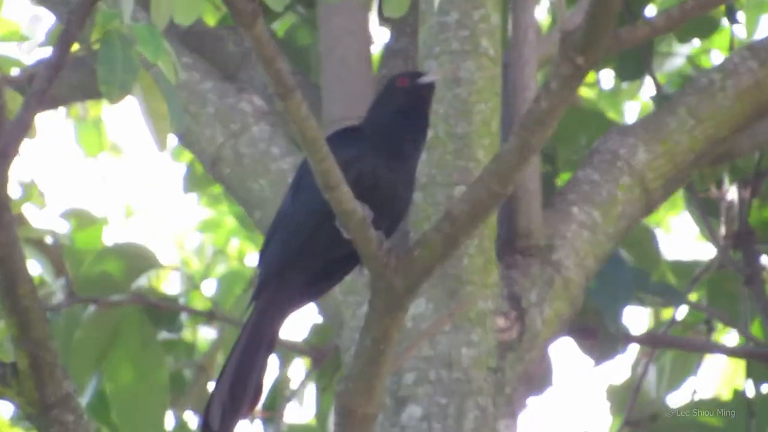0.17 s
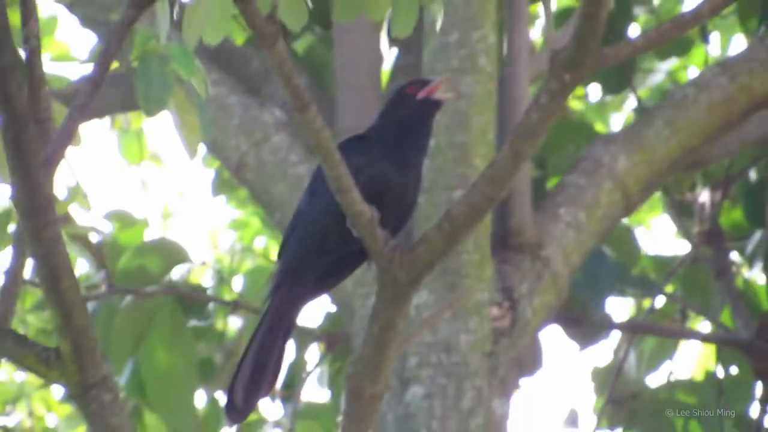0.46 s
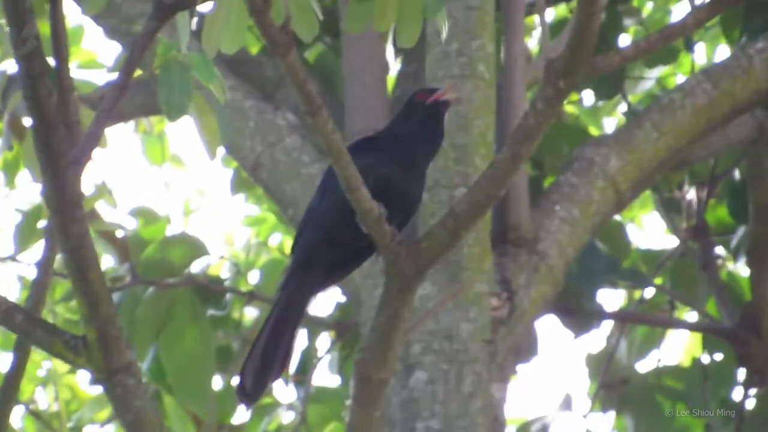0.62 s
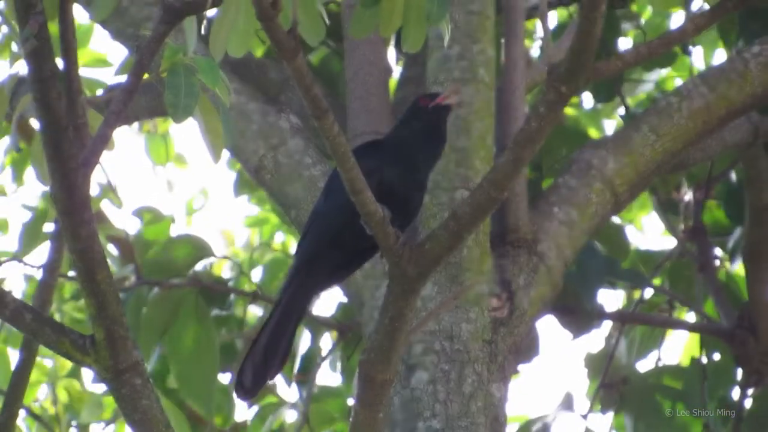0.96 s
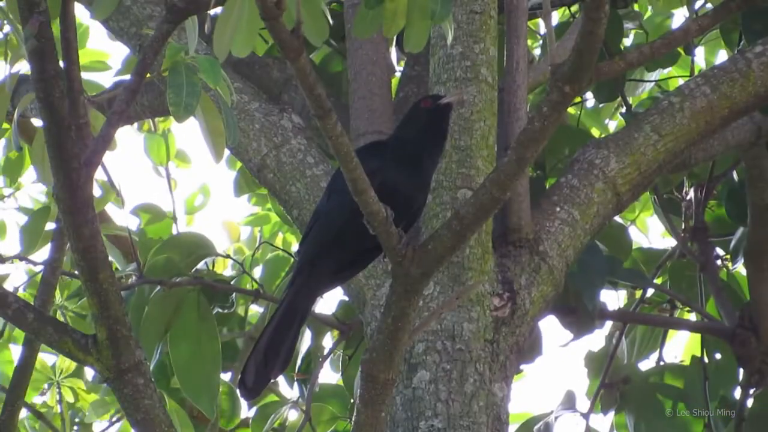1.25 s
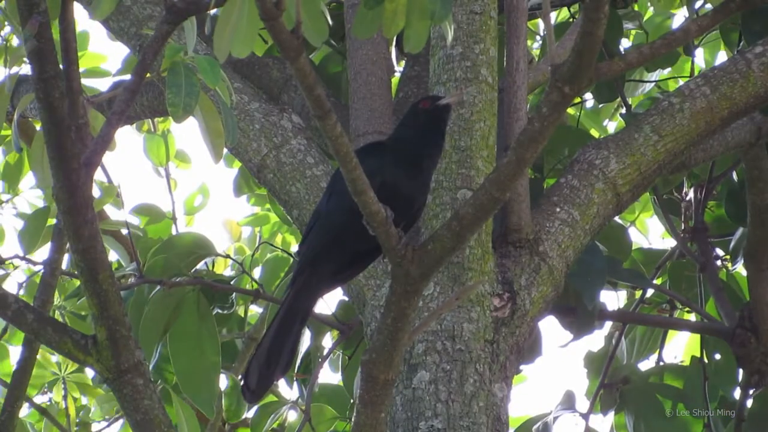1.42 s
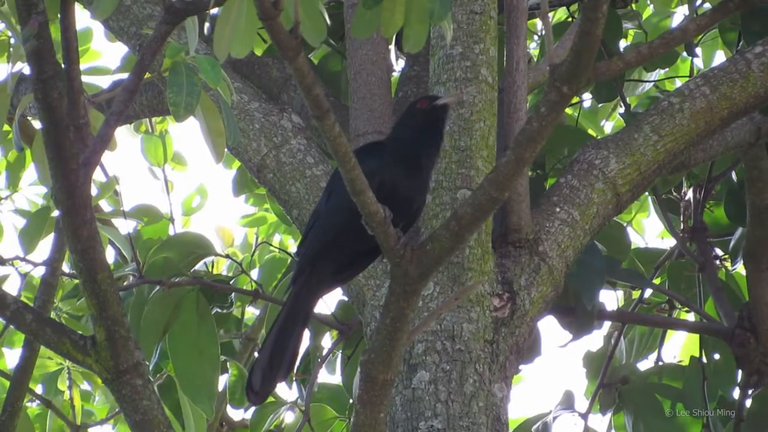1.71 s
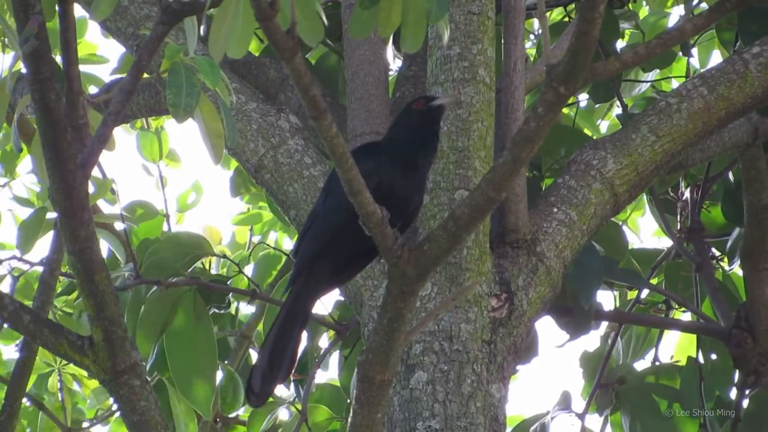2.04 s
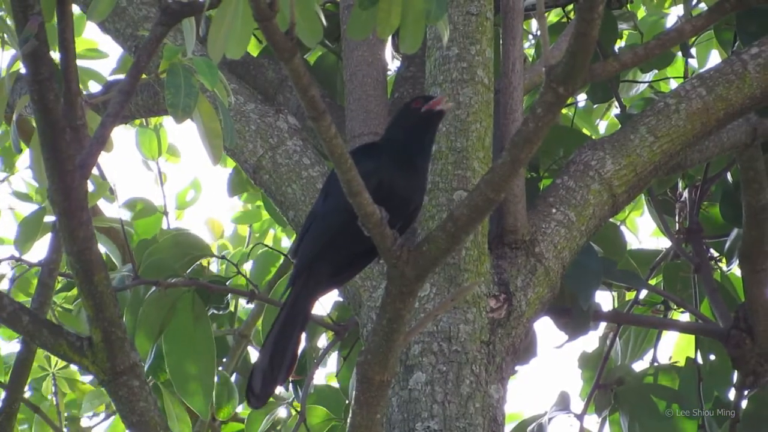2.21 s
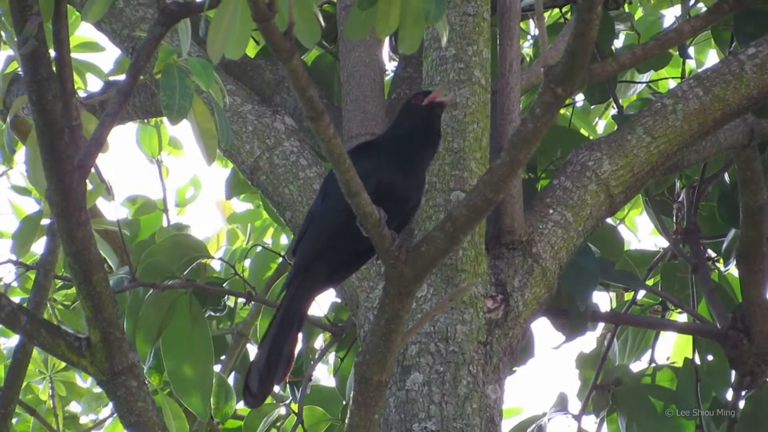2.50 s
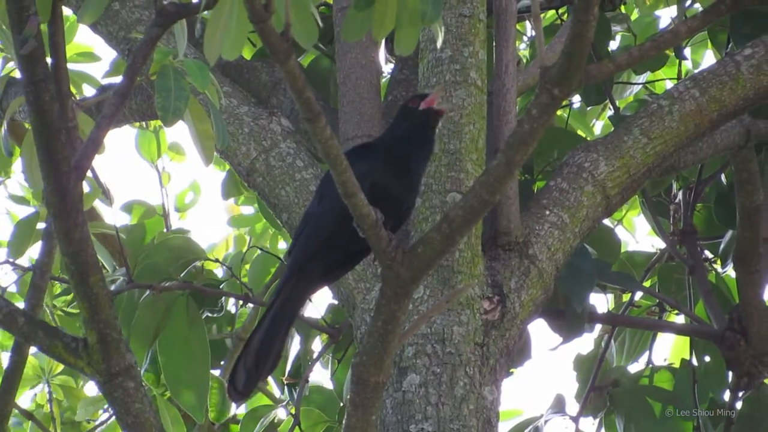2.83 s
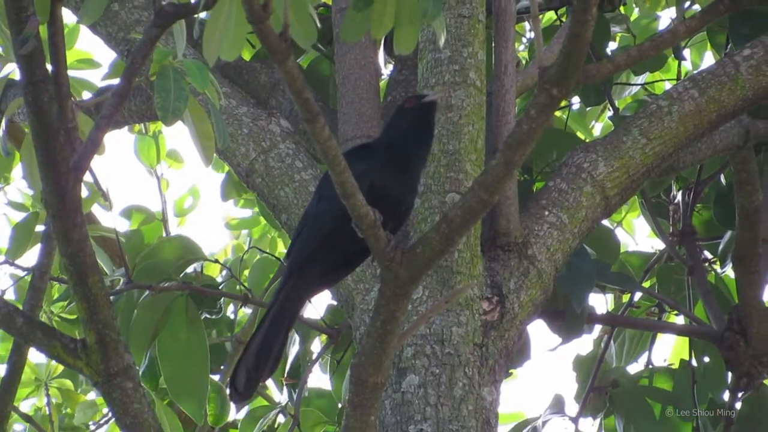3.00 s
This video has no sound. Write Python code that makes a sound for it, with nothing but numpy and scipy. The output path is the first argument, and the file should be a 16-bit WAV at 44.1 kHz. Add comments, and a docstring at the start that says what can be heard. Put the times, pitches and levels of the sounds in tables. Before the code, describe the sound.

Near-pure bird whistle from a tree, called twice with a gap, over steady low traffic, engine hum and light wind buffeting on a stereo camera microphone; tyre hiss swells midway, and tiny clicks tick early.

```python
"""An engine drones amid traffic roar and wind buffeting; a large cuckoo in a tree then whistles its call twice.
Each call is a near-level note, then one that arches up and falls: a gliding sine with weak overtones and echoes.
A vehicle hisses past, a small bird chirps far off, the camera ticks.
Roar and hiss are shaped noise, wind is low noise, engines are wavering tones plus a narrow noise band,
chirps are gliding sines and ticks are decaying ones."""
import sys
import numpy as np
from scipy import signal
from scipy.fft import rfft, irfft
from scipy.io import wavfile
from scipy.ndimage import uniform_filter1d

SR = 44100
rng = np.random.default_rng(int(sys.argv[2]) if len(sys.argv) > 2 else 0)


def dump(signal):
    """Clip the signal to [-1, 1] and save it as 16-bit WAV at the path in sys.argv[1]."""
    limited = np.clip(np.atleast_2d(signal).T, -1, 1)
    pcm = np.round(limited * 32767).astype(np.int16)
    wavfile.write(sys.argv[1], SR, pcm)


N = 139356


def amp(db):
    """Amplitude factor of a level in dB."""
    return 10 ** (np.asarray(db) / 20)


def evened(x):
    """Scales to rms 1."""
    return x / np.sqrt(np.mean(x ** 2) + 1e-20)


def read(points, hz):
    """Interpolates (Hz, value) points on a log-frequency axis."""
    f, value = np.transpose(points)
    return np.interp(np.log(hz + 1), np.log(f + 1), value)


def columns(rows, t):
    """Interpolates each column after the first (seconds) at times t."""
    rows = np.array(rows, float)
    return [np.interp(t, rows[:, 0], col) for col in rows[:, 1:].T]


def drift(top_hz):
    """Random wander of rms 1, low-passed at top_hz."""
    z = rfft(rng.standard_normal(N))
    hz = np.fft.rfftfreq(N, 1 / SR)
    return evened(irfft(z / (1 + (hz / top_hz) ** 4), N))


def placed(x, pan_db, lag_s=0.):
    """One source at two microphone ports: left over right level, and left delay."""
    hz = np.fft.rfftfreq(N, 1 / SR)
    late = irfft(rfft(x) * np.exp(-2j * np.pi * hz * lag_s), N)
    return np.array([late * amp(pan_db / 2), x * amp(-pan_db / 2)])


def noise(field_db, same, pan, lag_s, patchy_db, flicker_db):
    """Random short-time spectra under field_db(hz, t), with drifting patches and a shared treble flicker."""
    port_shift_rad, port_shift_top_hz = .6, 3000  # left port trails, less so with rising pitch
    frames, hz = N // 256 + 5, np.fft.rfftfreq(1024, 1 / SR)[:, None]
    t = np.arange(frames) * 256 / SR
    a, b, c, d, patches = rng.standard_normal((frames, 513, 5)).T

    patches = uniform_filter1d(patches, size=12, axis=0)
    patches = evened(uniform_filter1d(patches, size=12, axis=1))
    flicker = evened(uniform_filter1d(rng.standard_normal(frames), size=4))
    flicker = flicker * np.clip(hz / 5000, 0, 1)

    likeness = np.clip(read(same, hz), -1, 1)
    right = a + 1j * b
    left = likeness * right + np.sqrt(1 - likeness ** 2) * (c + 1j * d)
    lag_rad = 2 * np.pi * hz * lag_s(t) + port_shift_rad * np.exp(-hz / port_shift_top_hz)
    left = left * np.exp(-1j * lag_rad)

    pan_db = read(pan, hz)
    z = np.array([left * amp(pan_db / 2), right * amp(-pan_db / 2)])
    z *= amp(field_db(hz, t) + patchy_db * patches + flicker_db * flicker)
    return 32 * signal.istft(z, nperseg=1024, noverlap=768)[1][:, :N] / 1024


def echoes(x):
    """Sparse decaying taps of random sign and size from leaves and walls, partly shared by the two sides."""
    start_s, t60_s = .012, .8
    at = np.arange(round(start_s * SR), SR // 2, 40) + rng.integers(0, 40, (2, 1))
    at = at + rng.integers(0, 40, at.shape)
    taps = np.zeros((2, SR))
    tap_gains = rng.standard_normal(at.shape) * amp(-60 * at / SR / t60_s)
    np.put_along_axis(taps, at, tap_gains, 1)
    taps[1] = (taps[0] + taps[1]) / np.sqrt(2)
    return signal.fftconvolve(x[None], taps / np.linalg.norm(taps[0]), axes=1)[:, :N]


def wind():
    """Low buffeting: a common push, opposite in sign at the two ports, plus noise of each port's own."""
    component_db, low_hz, top_hz, apart = -32, 24.6, 69, 1
    hz = np.fft.rfftfreq(N, 1 / SR)
    low_pass = 1 / (1 + (hz / top_hz) ** 2)
    high_pass = hz ** 2 / (hz ** 2 + low_hz ** 2)
    shape = low_pass * high_pass
    push, left, right = [evened(irfft(rfft(z) * shape, N)) for z in rng.standard_normal((3, N))]
    return amp(component_db) * np.array([1.64 * (push + apart * left), -push + apart * right])


def roar():
    """Dull traffic as shaped noise; its level below 4 kHz eases off, most at the low end."""
    # Spectrum. Each row: frequency in Hz, density in dB per Hz before the offset and level curve.
    spectrum = [(45, -32), (90, -13), (270, -15.5), (970, -23), (1560, -23.5), (2050, -31), (10700, -46),
                (14500, -53)]
    # Low-end level. Each row: time in seconds, level in dB (-28 leaves the spectrum as is).
    low_level = [(.2, -21.5), (1.0, -25.5), (3.1, -28.5)]
    # Likeness of the sides. Each row: frequency in Hz, left-right correlation.
    likeness = [(100, .3), (280, .94), (9000, .2)]
    # Balance. Each row: frequency in Hz, left over right in dB.
    balance = [(130, 1), (8000, 3)]

    def field_db(hz, t):
        low_db = (columns(low_level, t)[0] + 28) * np.clip(1 - hz / 4000, 0, 1)
        return read(spectrum, hz) + 7.34 + low_db

    return noise(field_db, likeness, balance, lambda t: 0, patchy_db=1.34, flicker_db=-2.0)


def passing():
    """Tyre hiss as shaped noise that swells and brightens, louder on the right."""
    # Spectrum. Each row: frequency in Hz, density in dB per Hz before level curve and offset.
    spectrum = [(500, -5), (2490, -6), (3600, -13), (4870, -13), (8090, -20), (13300, -22.5), (14500, -37)]
    # Passage. Each row: time in seconds, level in dB before the offset.
    passage = [(0, -39), (.7, -35.5), (1.25, -31.5), (1.7, -28), (2.05, -30.5), (2.7, -32.5), (3.1, -39)]
    # Surging bands. Each row: centre in seconds, half length in seconds, centre in Hz,
    # half width in Hz, boost in dB.
    surges = [(1.12, 0.31, 2860, 455, 4.5), (1.34, 0.2, 1310, 895, 7), (1.754, 0.16, 2340, 364, 6.5)]
    # Likeness of the sides. Each row: frequency in Hz, left-right correlation.
    likeness = [(700, .95), (14000, .6)]
    # Balance. Each row: frequency in Hz, left over right in dB.
    balance = [(700, -6.5), (8000, -1.2)]
    treble_s, treble_span_s, treble_db_per_10khz = 1.72, .38, 3.5
    left_lag_s = 0.00003

    def field_db(hz, t):
        swell = np.exp(-((t - treble_s) / treble_span_s) ** 2)
        treble_db = treble_db_per_10khz * hz / 10000 * swell
        surge_db = sum(db * np.exp(-((t - s) / span) ** 4 - ((hz - f) / width) ** 2)
                       for s, span, f, width, db in surges)
        low_cut_db = 24 * np.log2(spectrum[0][0] / (hz + 1)).clip(0)  # 24 dB/octave below the first row
        return read(spectrum, hz) - low_cut_db + columns(passage, t)[0] + treble_db + surge_db + 21.43

    return noise(field_db, likeness, balance, lambda t: left_lag_s, patchy_db=1.9, flicker_db=1.07)


def engines():
    """Firing orders as wavering tones, and a narrow noise band, fuzzier, from a second engine."""
    # Near engine. Each row: time in seconds, level in dB.
    near_level = [(0, -29.5), (.5, -22), (.8, -27), (1.3, -21.5), (1.8, -20), (2.1, -28), (2.5, -21),
                  (3.16, -32.5)]
    # Orders. Each row: multiple of the base pitch, level in dB re the near level.
    orders = [(1, 1.5), (2, -9.5), (2.5, -13), (3, -10.5)]
    # Second engine. Each row: time in seconds, centre in Hz, level in dB.
    far_curve = [(0, 108, -33), (.5, 110, -29.5), (.7, 110, -34), (1.9, 108, -32.5), (2.45, 110, -24.5),
                 (3.0, 114, -30.5)]
    base_hz, waver_rms, flutter_db = 75.06, 0.0026, 1.5
    far_width_hz = 5.3
    pan_db, left_lag_s = 5., .0013
    t = np.arange(N) / SR

    level_db = columns(near_level, t)[0]
    phase = 2 * np.pi * np.cumsum(base_hz * (1 + waver_rms * drift(3.4))) / SR
    near = 0
    for k, order_db in orders:
        wander_db = flutter_db * drift(41.0) * (k != 1)  # the base order holds steady
        near = near + amp(order_db + wander_db) * np.sin(k * phase + 6.7 * rng.random())
    near = np.sqrt(2) * amp(level_db) * near

    far_hz, far_db = columns(far_curve, t)
    phase = 2 * np.pi * np.cumsum(far_hz) / SR
    far = amp(far_db) * (drift(far_width_hz) * np.cos(phase) + drift(far_width_hz) * np.sin(phase))
    return placed(near, pan_db, left_lag_s) + placed(far, pan_db, left_lag_s)


def chirps():
    """Short whistles of a small distant bird: sines that edge up, then fall."""
    # Each row: start in seconds, length in seconds, peak in Hz, pitch headed for in Hz
    # (the glide ends 71 % of the way there), level in dB.
    chirp_rows = [(.705, .09, 3080, 2600, -36), (2.25, .05, 3900, 3000, -37)]
    t, out = np.arange(N) / SR, 0
    for start, length, from_hz, to_hz, db in chirp_rows:
        u = np.clip((t - start) / length, 0, 1)
        hz = from_hz + (to_hz - from_hz) * abs(u - .2) ** 1.52
        tone = np.sin(2 * np.pi * np.cumsum(hz) / SR)
        swell = np.sqrt(2 * np.sin(np.pi * u).clip(0))
        out = out + placed(amp(db) * swell * tone, -0.55)
    return out


def ticks():
    """Tiny camera clicks: sines that start at once and decay exponentially."""
    # Each row: start in seconds, peak in dB, ring in Hz, T60 in seconds.
    tick_rows = [(.044, -19, 4800, .012), (.0455, -16, 1400, .03), (.678, -23, 11500, .008)]
    t, out = np.arange(N) / SR, np.zeros(N)
    for s, db, hz, t60 in tick_rows:
        u = (t - s).clip(0)
        out += amp(db - 60 * u / t60) * np.sin(2 * np.pi * hz * u)
    return placed(out, 1.9)


def cuckoo():
    """A near-pure gliding whistle; weak beaded overtones come out as the beak opens."""
    # Notes: level, arched, level, then an arch broken at its top into rise and fall.
    # Each row of a note: time in seconds, pitch in Hz, level in dB.
    note_curves = [
        [(.558, 1240, -23), (.584, 1214, -11.5), (.615, 1151, -17), (.68, 1139, -15.5), (.735, 1152, -16),
         (.75, 1150, -22)],
        [(.748, 1358, -24), (.795, 1420, -25), (.825, 1470, -34), (.87, 1584, -19.5), (.888, 1604, -27),
         (.91, 1627, -21), (.944, 1660, -20.5), (.968, 1635, -16), (.985, 1550, -22.5), (1.0, 1490, -24.5),
         (1.025, 1392, -22.5), (1.055, 1284, -26)],
        [(2.465, 1314, -30), (2.5, 1259, -21.5), (2.525, 1233, -13.5), (2.55, 1208, -14), (2.628, 1202, -15.5),
         (2.645, 1165, -42)],
        [(2.634, 1395, -22), (2.67, 1450, -28), (2.695, 1471, -39), (2.735, 1592, -19), (2.765, 1633, -29),
         (2.796, 1694, -17), (2.83, 1717, -17.5), (2.86, 1765, -14)],
        [(2.848, 1602, -31), (2.863, 1532, -10.5), (2.874, 1503, -30), (2.888, 1429, -12.5),
         (2.905, 1341, -11.5), (2.918, 1267, -24.5), (2.94, 1193, -13), (2.968, 1140, -20), (2.985, 1130, -27)],
    ]
    # Beak. Each row: time in seconds, level of the lower overtones in dB, level of the eighth in dB.
    beak_curve = [(.572, -65, -43), (.61, -65, -62), (.79, -49, -54), (.86, -41, -48), (.9, -30, -51),
                  (.935, -39, -52), (.965, -32, -53), (1.0, -47, -51), (1.06, -65, -59), (2.625, -65, -66),
                  (2.645, -44, -53), (2.7, -43, -52), (2.735, -32, -52), (2.775, -42, -54), (2.8, -35, -56),
                  (2.855, -38, -55), (2.87, -60, -65)]
    # Lower overtones. Each row: multiple of the pitch, level in dB re the beak curve.
    lower_overtones = [(2, -8), (3, 0), (6, -12), (7, -12)]
    edge_s, waver_rms, beak_flutter_db = .005, .002, 4.
    gate_hz, gate_span_hz = 1580, 60
    pan_db, echo_db = 1.5, -15
    t, out = np.arange(N) / SR, np.zeros(N)
    lower_db, eighth_db = columns(beak_curve, t)
    for note in note_curves:
        hz, level_db = columns(note, t)
        hz = uniform_filter1d(hz, size=300) * (1 + waver_rms * drift(59.0))
        phase = 2 * np.pi * np.cumsum(hz) / SR
        tone = amp(level_db) * np.sin(phase)
        tone += amp(eighth_db + beak_flutter_db * drift(50.)) * np.sin(8 * phase)
        high = np.clip((hz - gate_hz) / gate_span_hz, 0, 1)
        for k, db in lower_overtones:
            gate = high if db else 1  # the 0 dB overtone sounds at any pitch, the rest only above gate_hz
            tone += amp(lower_db + db + beak_flutter_db * drift(48.0)) * np.sin(k * phase) * gate
        inside_s = np.minimum(t - note[0][0], note[-1][0] - t)
        out += np.sqrt(2) * tone * np.clip(inside_s / edge_s + .5, 0, 1)
    return placed(out, pan_db) + amp(echo_db) * echoes(out)


def scene():
    """Sums all sources in stereo."""
    return wind() + roar() + passing() + engines() + chirps() + ticks() + cuckoo()


def record(dry):
    """Two narrow notches in the camera's sound path, then a low-pass band limit."""
    # Each row: centre in Hz, width in Hz, depth from 0 to 1.
    notch_rows = [(3930, 300, .7), (7875, 130, .99)]
    edge_hz = 14400
    hz = np.fft.rfftfreq(N, 1 / SR)
    gain = np.ones(len(hz))
    for f, width, depth in notch_rows:
        gain *= 1 - np.clip(depth, 0, 1) * np.exp(-(2 * (hz - f) / width) ** 2)
    notched = irfft(rfft(dry) * gain, N)
    low_pass = signal.firwin(511, edge_hz, window=("kaiser", 9), fs=SR)
    return signal.oaconvolve(notched, low_pass[None], "same")


dry = scene()
out = record(dry)
dump(out)
```